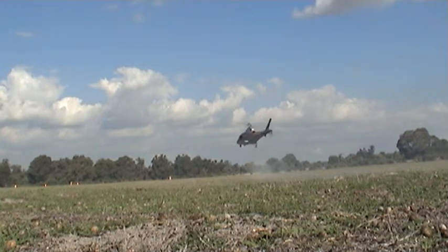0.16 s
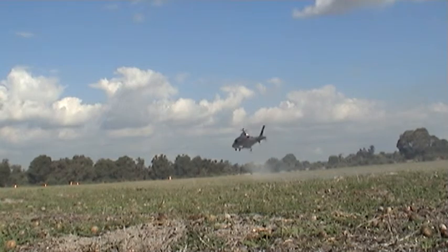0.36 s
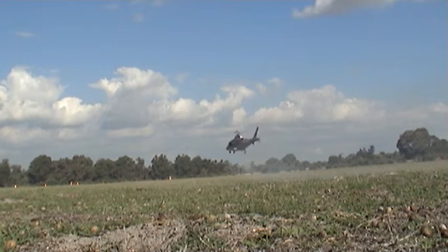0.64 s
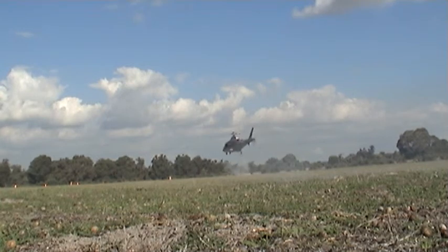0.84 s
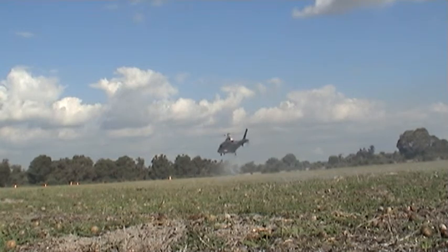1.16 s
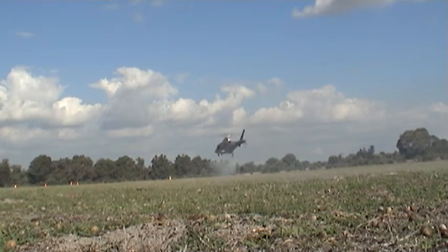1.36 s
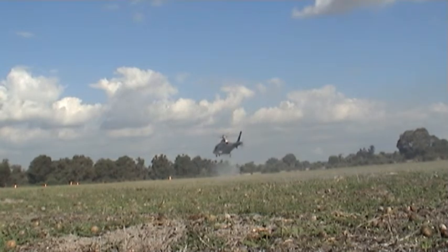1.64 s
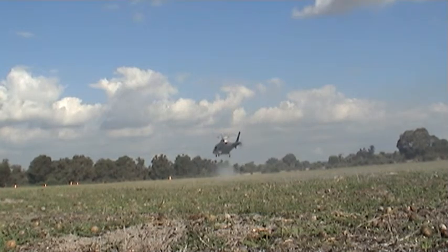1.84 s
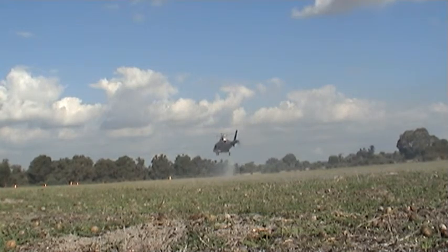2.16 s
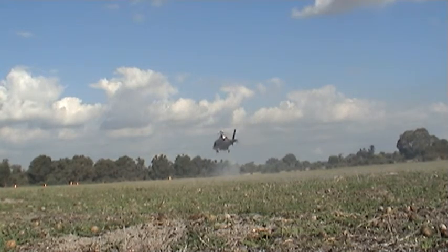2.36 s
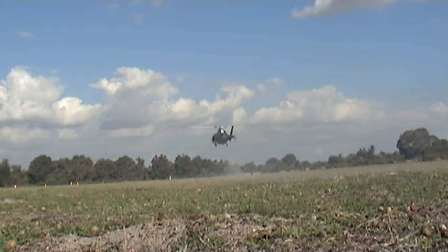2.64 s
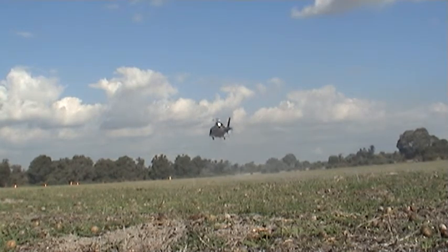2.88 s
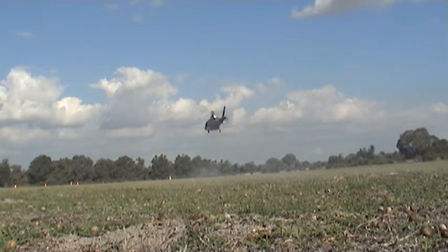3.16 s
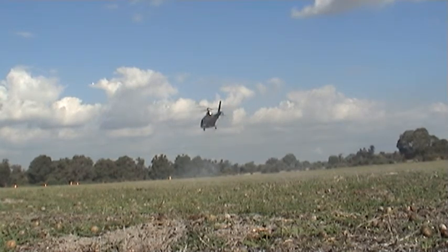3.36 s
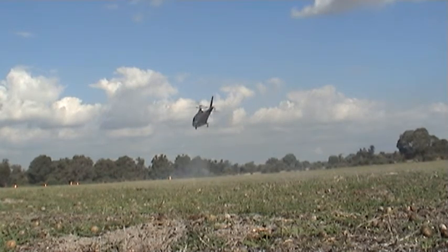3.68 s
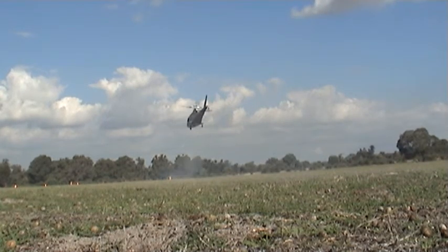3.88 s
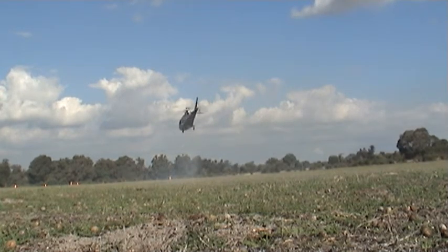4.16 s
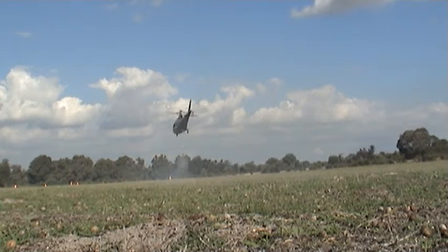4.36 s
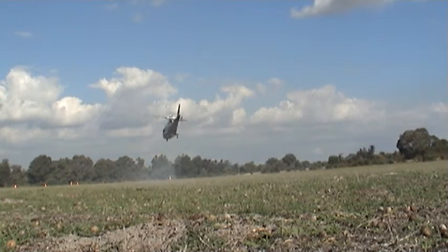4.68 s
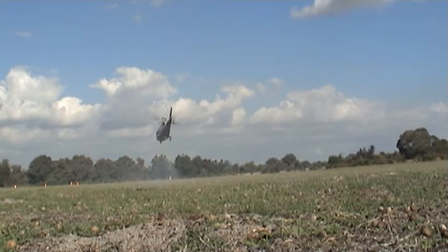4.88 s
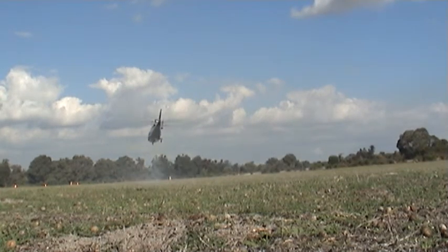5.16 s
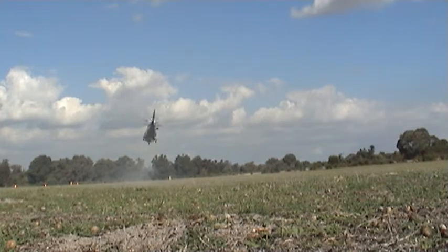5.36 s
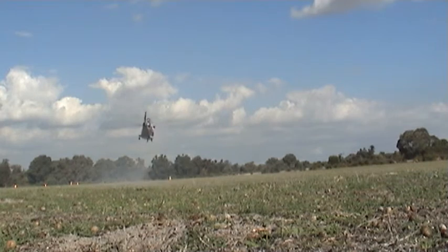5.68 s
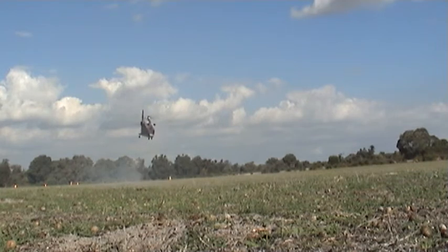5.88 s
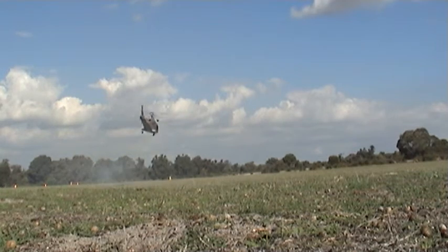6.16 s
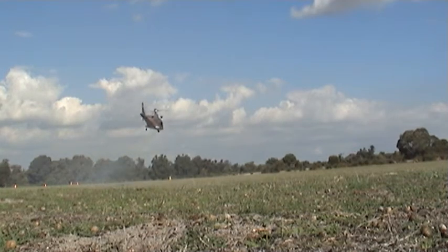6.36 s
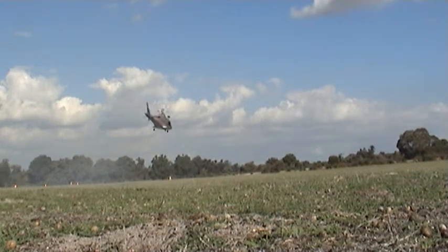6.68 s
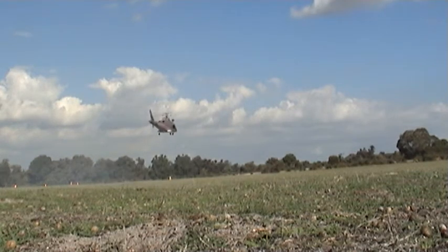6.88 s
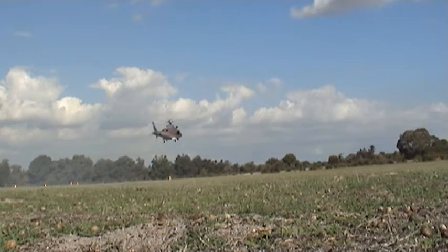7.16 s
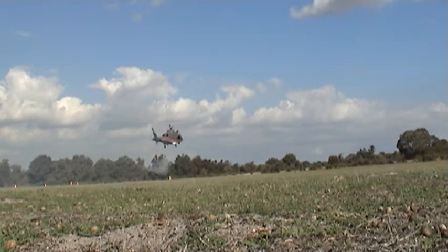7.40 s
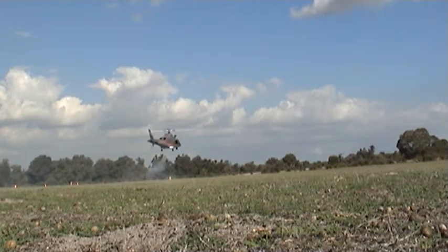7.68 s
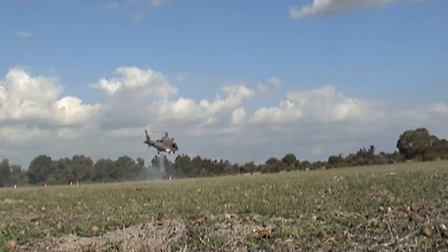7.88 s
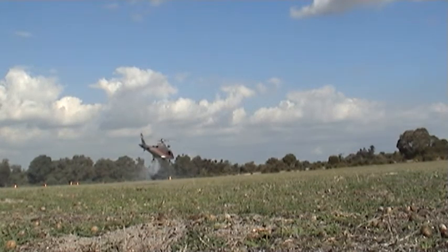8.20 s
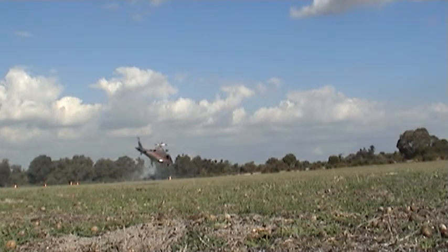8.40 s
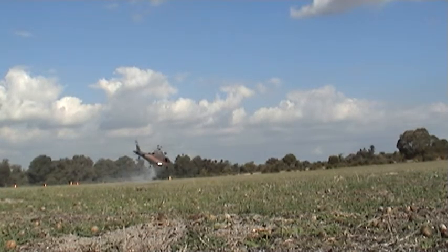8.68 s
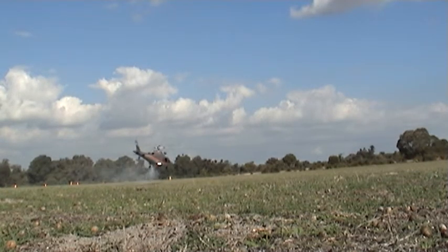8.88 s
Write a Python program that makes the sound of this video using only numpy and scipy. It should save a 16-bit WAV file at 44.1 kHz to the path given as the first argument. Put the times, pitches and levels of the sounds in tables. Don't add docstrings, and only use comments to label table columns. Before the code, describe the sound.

A small glow-engine model helicopter hovers over an open field, a loud, steady nasal drone near 248 hertz with rotor flutter and light wind.

```python
import sys
import numpy as np
from scipy import signal
from scipy.fft import rfft, irfft, next_fast_len
from scipy.io import wavfile
from scipy.ndimage import uniform_filter1d, map_coordinates

SR = 44100
rng = np.random.default_rng(int(sys.argv[2]) if len(sys.argv) > 2 else 0)


def gain_from_decibels(decibels):
    exponent = np.asarray(decibels, float) / 20
    return 10 ** exponent


def transcribe(signal):
    frames = np.atleast_2d(signal).T
    limited = np.clip(frames, -1, 1)
    pcm = np.round(limited * 32767).astype(np.int16)
    wavfile.write(sys.argv[1], SR, pcm)


N = 398659

ROTOR, TAIL, MESH, START = .11813, .55115, 21.958, .35
USUAL_DB = -14.7
BREEZE_DB = -52.5

# t/s, crank speed f/Hz, firing tone level/dB
ENGINE = [(0, 247.38, -15.5), (.45, 246.5, -13.8), (1.0, 247.75, -14.1), (1.4, 248.0, -14.3),
          (1.8, 248.46, -13.8), (2.2, 247.7, -13.4), (2.8, 249.0, -14.5), (3.7, 250.27, -16),
          (4.2, 249.3, -16.4), (4.7, 249.25, -16.1), (5.7, 246.7, -14.6), (6.4, 246.28, -15),
          (6.85, 248.75, -15.6), (7.2, 249.28, -15.5), (7.6, 248.2, -14), (8.2, 248.84, -14.1),
          (8.4, 247.8, -13.6), (9.04, 247.16, -13.4)]
# t/s, peak level/dB, share on the right port/0-1
POPS = [
    (2.941, -28, .9),
    (3.311, -27, .9),
    (4.828, -27, 0.8),
    (6.827, -23, .3),
    (6.87, -23, .8),
    (6.907, -15, 0.55),
    (6.956, -24, 1),
    (7.604, -15, .7),
]
# t/s, lead/0-1
LEAD = [
    (0, 0.85),
    (6.85, 1),
    (6.98, .5),
    (7.7, 0.44),
    (9.04, 0.66),
]
# order/crank, level/dB
UPPER = [(8, -65), (12, -60.5), (13, -59.5), (14, -62.5), (17, -64), (19, -73)]
# order/crank, order/rotor, order/tail shaft, level under firing
# tone/dB
MIXED = [(1, -2, 0, -38.5), (1, 1, 0, -36.5), (1, 6, 0, -35.5), (2, 1, 0, -30.5), (2, 2, 0, -34),
         (1, 0, 1, -27.5), (1, 0, 2, -43), (3, 0, 1, -36.5)]
# f/Hz, level/dB per Hz
EXHAUST = [(45, -25), (80, -13.5), (200, -10.5), (310, -4), (420, -4.5), (580, -1.5), (800, -6.5),
           (1200, -11.5), (1750, -11.5), (2100, -16), (2800, -21.5), (4000, -42)]
# f/Hz, level/dB per Hz
CASING = [(1500, -16), (2400, -5.5), (3300, 0), (4600, -1), (6300, -5.5), (8200, -3.5), (9900, -7),
          (10800, -4.5), (12000, -14.5), (14500, -8), (17000, -15.5)]
# f/Hz, level/dB per Hz
SWISH = [(9000, -21), (12200, -5.5), (13500, -1), (15000, 2), (17000, -3)]
# f/Hz, level/dB per Hz
CRACK = [(1300, -20), (2100, -1), (2800, 0), (3800, -9), (7000, -13), (9000, -30)]
# f/Hz, level/dB per Hz
BUFFET = [(15, -22), (35, -2), (70, 0.5), (150, -7.5), (300, -23), (800, -47)]
# f/Hz, left minus right level/dB, left phase lead/rad
PORTS = [(60, -1.5, 0.12), (250, -0.3, 0.21), (700, 1, 0.18), (1310, 1.5, 0.1), (2410, 0.43, .03),
         (4960, 0, 0.052), (8500, 1.2, 0.14), (10000, 1.5, .07), (11000, .1, 0.61), (12900, 3, 0.19),
         (14000, 0.5, .07), (15500, 2.5, .14)]
# f/Hz, width/Hz, level/dB
FINS = [(7550, 470, -4), (8190, 260, 0.5), (9130, 520, -1.5), (11000, 690, -5)]
# t/s, level/dB, side tones over mesh tone/dB, upper over lower side tone/dB
GEAR = [(0.0, -43, 6.0, 3.0), (0.43, -47.5, 2.0, -0.0), (1.0, -44.5, -6.0, -7.0), (1.36, -42, -7, -2.0),
        (2.22, -47.5, 5, 3.0), (2.49, -39.5, 6.0, 11), (3.23, -39, 6.0, 8.0), (3.72, -37, -6, -5.0),
        (4.28, -36.5, -17, 5.0), (4.92, -38, -6.0, 8.0), (5.56, -46, 10, 1), (5.85, -40, -3.0, 7),
        (6.14, -43.5, 8, -2), (6.75, -34.5, 10, 7), (7.44, -46.5, 9, 2), (7.84, -37, 2, -13.0),
        (8.27, -44.0, 5, -12), (9.04, -43.0, 6.0, -16)]
# t/s, level/dB
SLAP = [
    (0, -57),
    (4.8, -58),
    (5.03, -45),
    (5.38, -46.5),
    (5.55, -60),
    (8.2, -56),
    (8.6, -63),
]
# t/s, heading/degrees (0 = nose on), engine bay exposure level/dB
FLIGHT = [(0.0, -69, -0.7), (0.43, -75, -3.5), (1.04, -71, -2.4), (1.57, -60, -1.5), (2.24, -61, -3),
          (2.81, -71, 1), (3.2, -51, 2), (3.5, -41, 2.5), (4.27, -30, 2.3), (4.56, -18, 0.9),
          (5.49, -1, -3), (5.89, 3, 0.8), (6.34, 31, 2.2), (7.14, 51, 1), (7.56, 36, 0.5), (8.04, 55.5, -1),
          (8.52, 60, -3.5), (9.04, 52, -3.7)]
PARTS = [2, 3, 4, 5, 6, 7, 9, 11, 16, "thump", "chop", "tail", "tail octave", "casing", "piston", "swish",
         15]
# loudest level/dB, slope/dB per dB of exposure, slope/dB per dB of firing tone,
# lobe depth/dB, loudest heading/degrees
BEAMS = [(-25.5, -0.2, 0.4, 3.0, 164), (-26.5, -0.01, -0.9, 2.7, 22), (-35.5, 0.7, -0.9, 2.2, -83),
         (-31.0, 2.1, 3.0, 4.5, -167), (-36.5, 0.85, -0.6, 3.0, -117), (-29.5, 0.14, -0.76, 24.0, -24.5),
         (-48.0, 0.4, -4.5, 7.0, -135), (-49.5, 1.2, 3.5, 6.5, -75), (-52.0, 1.5, 1.7, 2.5, -45),
         (-38.5, 0.1, 1.0, 2.1, -158), (-38.5, -0.66, -1.2, 10.5, -20), (-31.5, -0.3, -0.1, 3.5, -97),
         (-35.5, 0.35, 0.5, 0.5, 162), (-40.5, 1.0, 0.25, 0.5, -170), (-42.0, 1.72, 0.0, 9.5, -8),
         (-44.5, 0.6, -1.0, 6.6, -2), (-52, .5, -1, 30, 63)]
# t/s, left port level/dB, right port level/dB, half length/s
GUSTS = [(0, -45, -47, .15), (.7, -45, -52, .2), (1.302, -44, -49, .4), (2.05, -43, -46, 0.28),
         (2.85, -39, -42, .17), (3.05, -43, -43, .1), (3.3, -44, -41, .08), (4.25, -50, -40, .1),
         (4.78, -47, -44, .08), (6.3, -50, -45, .08), (6.95, -42, -33, 0.11), (7.3, -38, -40, .2),
         (7.6, -44, -40, .06), (7.88, -47, -40, 0.088), (8.35, -45, -48, .2)]
# t/s, level change/dB, half length/s
EDDIES = [(.05, 2, .1), (.4, -3, 0.14), (1.2, 3, .2), (2.1, -2, .12), (3.1, 0.5, .15), (4.27, -0.5, .08),
          (4.55, 2.5, 0.11), (6.1, -0.5, .1), (6.65, 1, .15), (7.077, -5, 0.082), (7.27, 2.5, .07),
          (7.48, -3.5, .08), (8.28, 5, 0.088), (8.56, -9, 0.12), (8.8, -3, .15)]
EDDY_SHARE = {"casing": 0.34, "piston": 1.6, "swish": .7, "16": 0.54, "6": 0.25}
GLINTS = {"16": [(.8, -8, .5), (2.7, 7, 0.32), (5.83, 4, .1), (7.3, 4, .3), (8.6, -6, .5)],
          "11": [(6.09, 9.5, .25), (5.4, -5, .3)], "6": [(7.4, 4.5, 0.27)], "5": [(7.2, 3, .2),
          (7.9, -7, 0.28), (5.4, 3.5, 0.32)], "casing": [(1.9, 2, .12), (5.55, -1.5, 0.17),
          (7.15, -1.5, 0.16)], "2": [(4.9, -2, 0.28), (6.45, 3, 0.16)], "9": [(.6, -4, .4), (1.7, 7, .3)],
          "swish": [(1.6, -2, .5), (3.2, 3, .3), (4.27, -3, .1), (5.5, 3, .15), (8.28, -3, .08),
          (9, 4, .15)], "piston": [(2.2, 4, .1), (4.3, 2, .5), (5.97, 2.5, 0.087), (7.4, -2, .3)],
          "chop": [(6.2, -6, .6)], "tail octave": [(3.4, -3, .4), (6.8, 2, .4)]}


def unit(x):
    return x / np.sqrt(np.mean(x ** 2) + 1e-20)


def along(points, hz, axis=1):
    table = np.transpose(points)
    return np.interp(np.log(hz + 1), np.log(table[0] + 1), table[axis])


def curves(rows):
    times, *columns = np.transpose(rows)
    return [np.interp(np.arange(N) / SR, times, column) for column in columns]


def swells(rows):
    t = np.arange(0, N + 64, 64) / SR
    total = 0 * t
    for s, db, half in rows:
        total = total + db * np.exp(-((t - s) / half) ** 2)
    return np.interp(np.arange(N) / SR, t, total)


def wobble(rate):
    coarse = np.arange(0, N + 16, 16)
    knots = rng.standard_normal(int(N * rate / SR) + 4)
    smooth = map_coordinates(knots, [coarse * rate / SR], order=2)
    return unit(np.interp(np.arange(N), coarse, smooth))


def filtered(x, response):
    m = next_fast_len(N + 8192)
    return irfft(rfft(x, m) * response(np.fft.rfftfreq(m, 1 / SR)), m)[..., :N]


def rush(spectrum, patchy_db):
    z = signal.stft(rng.standard_normal(N), nperseg=512)[2]
    field = uniform_filter1d(rng.standard_normal(z.shape), size=8, axis=0)
    field = uniform_filter1d(field, size=24, axis=1)
    patched = signal.istft(z * gain_from_decibels(patchy_db * unit(field)), nperseg=512)[1][:N]
    return unit(filtered(patched, lambda hz: gain_from_decibels(along(spectrum, hz))))


def tone(angle, db, sway_db=0):
    if sway_db:
        db = db + sway_db * wobble(4)
    return np.sqrt(2) * gain_from_decibels(db) * np.cos(angle)


def gusts():
    t = np.arange(0, N + 64, 64) / SR
    power = gain_from_decibels(2 * BREEZE_DB)
    for s, left, right, half in GUSTS:
        power = power + gain_from_decibels(2 * np.array([[left], [right]])) * np.exp(-((t - s) / half) ** 2)
    return np.array([np.interp(np.arange(N) / SR, t, 10 * np.log10(p)) for p in power])


def wind():
    lumps = gain_from_decibels(2.1 * np.array([wobble(20), wobble(18), wobble(15)]))
    shared, left, right = lumps * [rush(BUFFET, patchy_db=3) for _ in range(3)]
    buffeting = unit(shared + 0.86 * np.array([left, right]))
    out = gain_from_decibels(1.2 * (gusts() + 40.0) - 40.5) * buffeting
    t = np.arange(-600, 600) / SR
    push = -t / 0.0015 * np.exp(.5 - .5 * (t / 0.0013) ** 2)
    for s, db, share in POPS:
        start = round(s * SR) - len(t) // 2
        out[:, start:][:, :len(t)] += gain_from_decibels(db) * push * [[1 - share], [-share]]
    return out


def swish(crank, level):
    since = (ROTOR * crank / (2 * np.pi) - .14) % 1
    sweep = 0.18 + np.exp(-((since - .12) / .085) ** 2)
    flutter = gain_from_decibels(.6 * wobble(25) + 1.8 * wobble(500))
    return gain_from_decibels(level["swish"] + 2.5) * unit(sweep * flutter) * rush(SWISH, patchy_db=0.0)


def slap(blade):
    bursts = unit(np.exp(30 * np.cos(blade)) * gain_from_decibels(1.5 * wobble(60)))
    return gain_from_decibels(curves(SLAP)[0]) * bursts * rush(CRACK, patchy_db=.5)


def airflow(crank, level):
    casing_db = level["casing"]
    blade = 2 * ROTOR * crank - 4.3
    beat = gain_from_decibels(1.37 * np.cos(blade) + 0.3 * wobble(20))
    low = gain_from_decibels(0.23 * (casing_db + 44) - 32.5) * beat * rush(EXHAUST, patchy_db=1)
    firing_gate = 1 + .13 * np.cos(crank - 1.5)
    high = gain_from_decibels(casing_db + 2.5) * beat * firing_gate * rush(CASING, patchy_db=0.5)
    return low + high + slap(blade) + swish(crank, level)


def gears(crank):
    whine_db, depth_db, lean_db = curves(GEAR)

    def share(db):
        return -10 * np.log10(1 + gain_from_decibels(2 * db))

    mesh_db = whine_db + share(depth_db)
    sides_db = whine_db + share(-depth_db)
    lower_db = sides_db + share(lean_db)
    upper_db = sides_db + share(-lean_db)
    load = ROTOR * crank
    teeth = MESH * crank + .25 * wobble(60) + 0.88 * wobble(22) + .5 * np.cos(load)
    whine = tone(teeth, mesh_db, sway_db=1.6)
    sides = tone(teeth - 4 * load, lower_db) + tone(teeth + 4 * load, upper_db - 3.0)
    slips = sum(tone(teeth + k * crank, -75, sway_db=6.0) for k in (-2, -1, 1))
    resonance = lambda hz: 1 / (1 + ((hz - 5450) / 170) ** 2)
    ring = unit(filtered(rng.standard_normal(N), resonance))
    return whine + sides + slips + gain_from_decibels(whine_db - 5.0) * ring


def rotors(crank, level):
    tail_db, octave_db, chop_db, thump_db = (level[p] for p in ("tail", "tail octave", "chop", "thump"))
    main = 2 * ROTOR * crank + 1.66
    tail = 2 * TAIL * crank + 2.21
    thump = sum(tone(k * main - 1.1, thump_db + db, sway_db=0.5) for k, db in enumerate([-2, 0, -6], 1))
    chop = tone(crank + main, chop_db - 5 + 1.8 * wobble(15), sway_db=3.0)
    chop = chop + tone(crank + 2 * main, chop_db - 3 + 2.2 * wobble(15), sway_db=2)
    buzz = sum(tone(k * tail, tail_db / 2 + db, sway_db=2.2)
               for k, db in enumerate([-24.0, -29.5, -33.5, -36], 3))
    hum = tone(tail - np.pi, tail_db) + tone(2 * tail - np.pi, octave_db + 1.2 * wobble(18))
    return thump + chop + buzz + hum


def fins(hz):
    total = 0
    for k, (centre, width, db) in enumerate(FINS):
        damping = 1j * hz * width
        total = total + (-1) ** k * gain_from_decibels(db) * damping / (centre * centre - hz * hz + damping)
    return total


def piston_slap(crank, level):
    turn = (crank + 0.028 * wobble(80)) / (2 * np.pi) % 1
    habit = np.fft.irfft(np.exp(2j * np.pi * rng.random(65)), 128)
    repeat = unit(map_coordinates(habit, [128 * turn], order=1, mode="grid-wrap"))
    gate = gain_from_decibels(2.1 * np.cos(crank - 1.5) + 1.45 * wobble(70))
    knocks = gate * (0.86 * repeat + rng.standard_normal(N))
    ringing = unit(filtered(knocks, lambda hz: fins(hz) * abs(fins(hz))))
    return gain_from_decibels(1.03 * (level["piston"] + 45.5) - 47.5) * ringing


def clatter(crank, level):
    beamed = [(k, level[k]) for k in (11, 16, 9, 15)]
    shading = np.cos(2 * ROTOR * crank) + wobble(30)
    uneven = crank + 0.024 * wobble(90)
    orders = sum(tone(k * uneven - 1.5, db + 1.65 * shading, sway_db=1.2) for k, db in [*UPPER, *beamed])
    return orders + piston_slap(crank, level)


def exhaust(crank, level):
    first_db = curves(ENGINE)[1]
    uneven = crank + 0.025 * wobble(70)
    out = tone(crank, first_db + 0.16 * wobble(40), sway_db=0.33)
    for k in PARTS[:6]:
        lag = 2.22 * (1 - np.exp((1 - k) / 2.4))
        out = out + tone(k * uneven - lag, level[k] + 0.14 * wobble(40), sway_db=1.23)
    for engine, rotor, tail, db in MIXED:
        angle = (engine + rotor * ROTOR + tail * TAIL) * crank + rng.uniform(0, 2 * np.pi)
        out = out + tone(angle, first_db + db + 2.4 * wobble(14))
    return out


def heard():
    heading, exposed_db = curves(FLIGHT)
    firing_db = curves(ENGINE)[1] - USUAL_DB
    eddy_db = swells(EDDIES)
    x, y = np.cos(np.radians(heading)), np.sin(np.radians(heading))
    level = {}
    for part, (db, bay, fire, lobe_db, aim) in zip(PARTS, BEAMS):
        name = str(part)
        facing = x * np.cos(np.radians(aim)) + y * np.sin(np.radians(aim))
        passing = EDDY_SHARE.get(name, 0) * eddy_db + swells(GLINTS.get(name, []))
        level[part] = db + bay * exposed_db + fire * firing_db - lobe_db * (1 - facing) + passing
    return level


def ports(x):
    def half(hz):
        return np.tanh(np.log(gain_from_decibels(along(PORTS, hz))) / 2 + .5j * along(PORTS, hz, axis=2))

    bass = lambda hz: 1 / (1 + (hz / 450) ** 4)
    bass_side = filtered(x, lambda hz: half(hz) * bass(hz))
    side = filtered(x, half) + (curves(LEAD)[0] - 1) * bass_side
    return np.array([x + side, x - side])


def scene():
    crank = 2 * np.pi * (np.cumsum(curves(ENGINE)[0]) / SR + START)
    level = heard()
    craft = airflow(crank, level) + gears(crank) + rotors(crank, level)
    craft = craft + clatter(crank, level) + exhaust(crank, level)
    return wind() + ports(craft)


def top_cut(x):
    return signal.sosfilt(signal.butter(12, 16610, fs=SR, output="sos"), x)


def record(dry):
    kept = filtered(dry, lambda hz: hz < 15800)
    return top_cut(kept)


dry = scene()
out = record(dry)
transcribe(out)
```